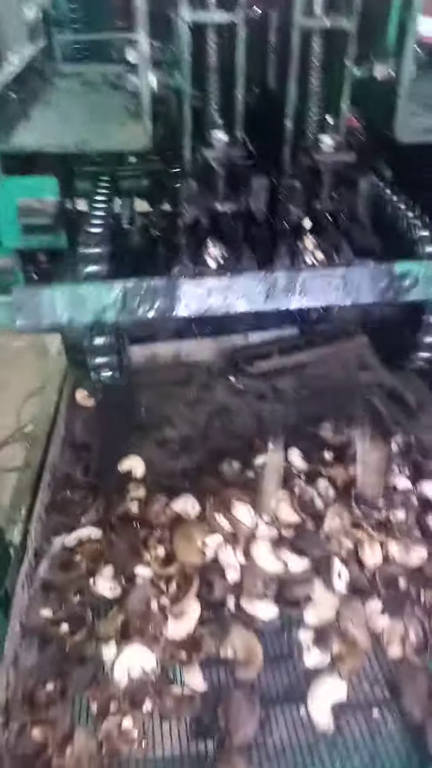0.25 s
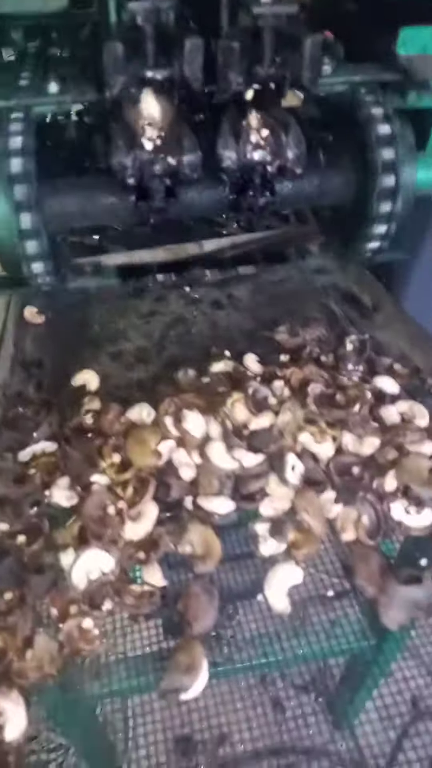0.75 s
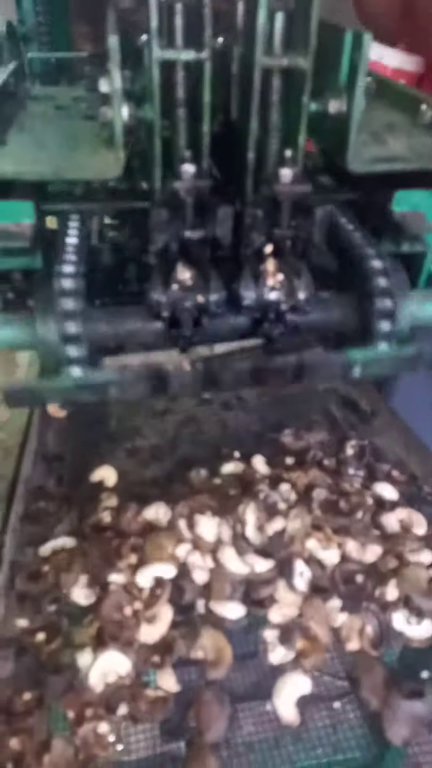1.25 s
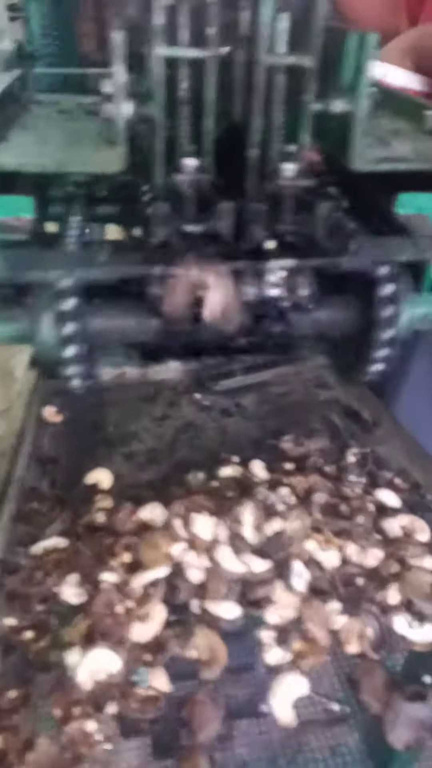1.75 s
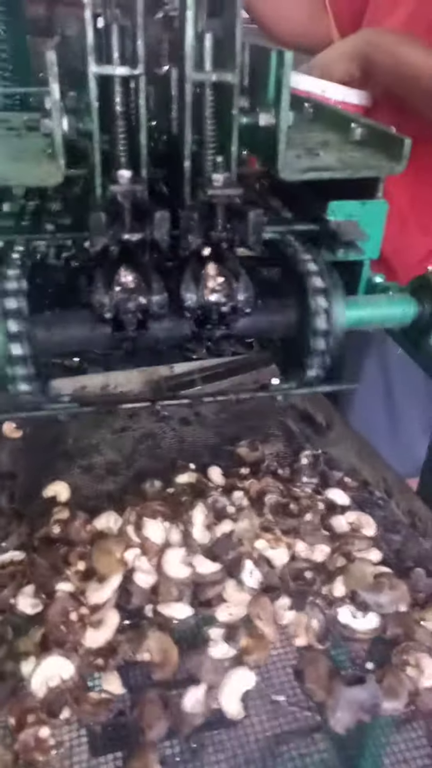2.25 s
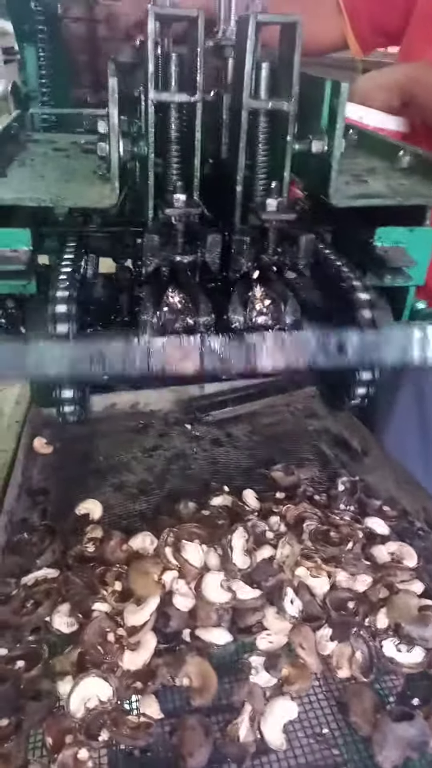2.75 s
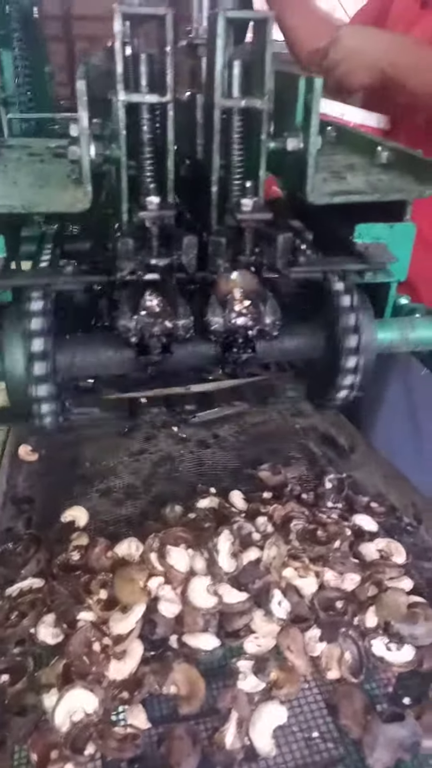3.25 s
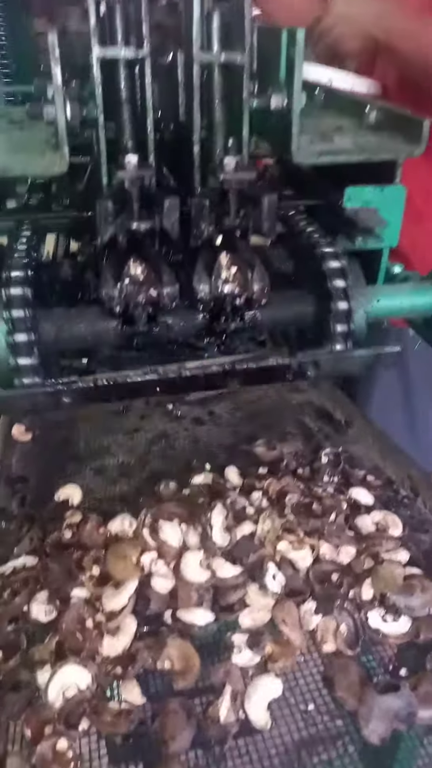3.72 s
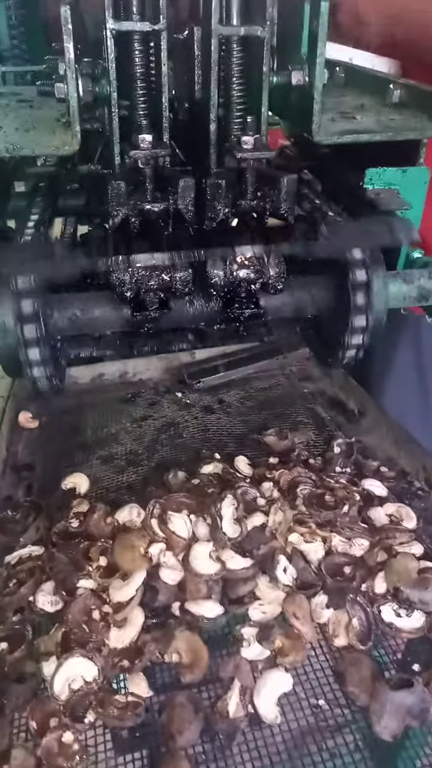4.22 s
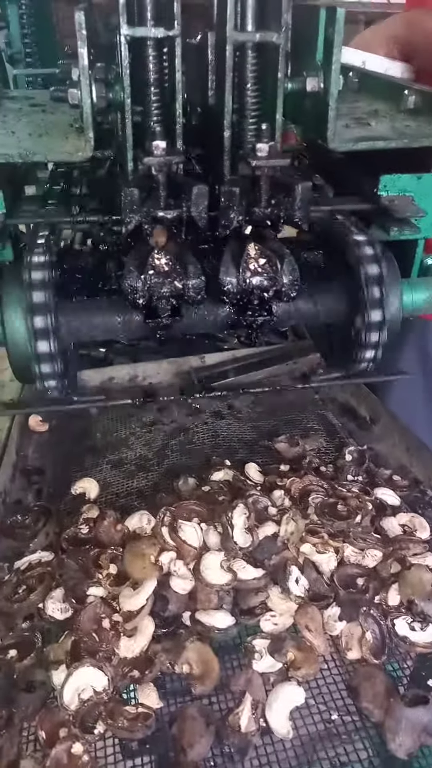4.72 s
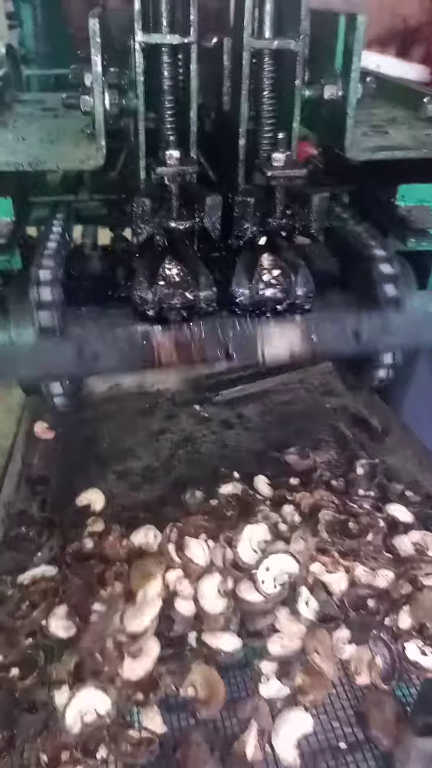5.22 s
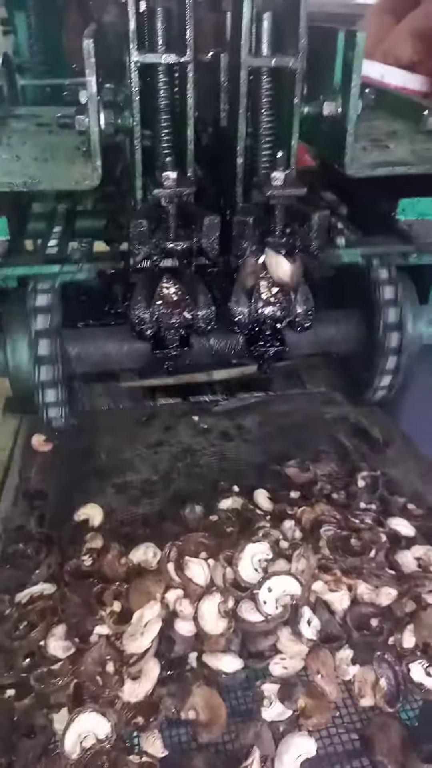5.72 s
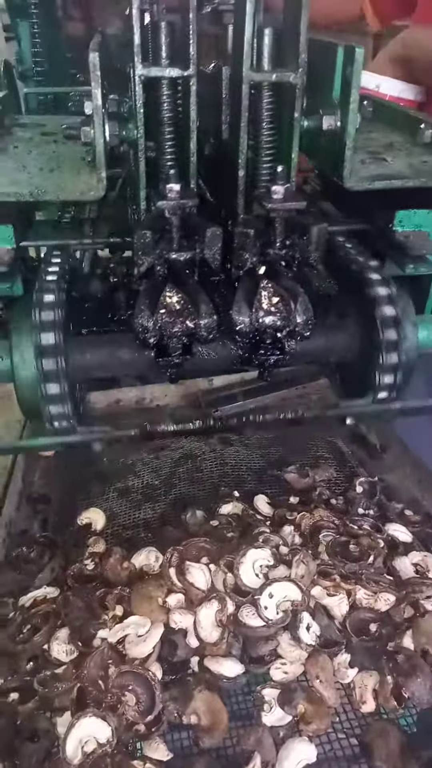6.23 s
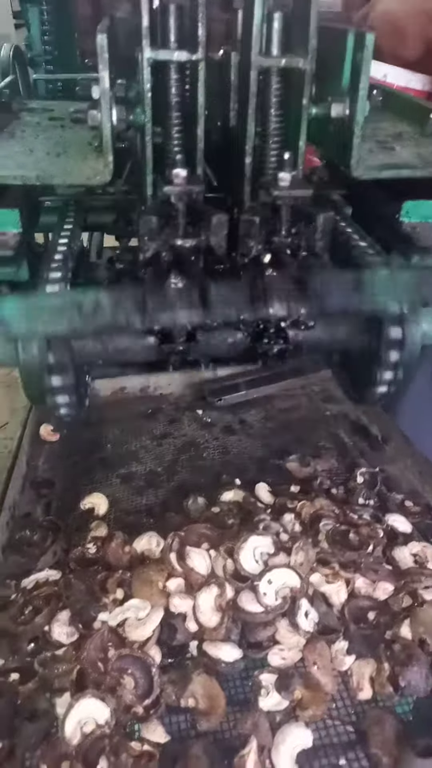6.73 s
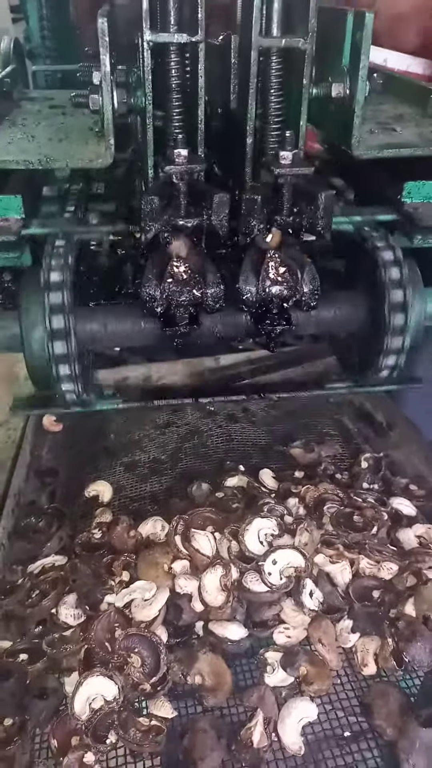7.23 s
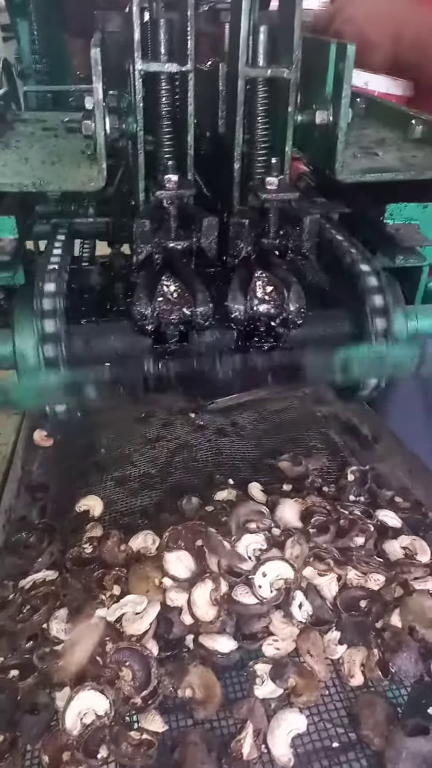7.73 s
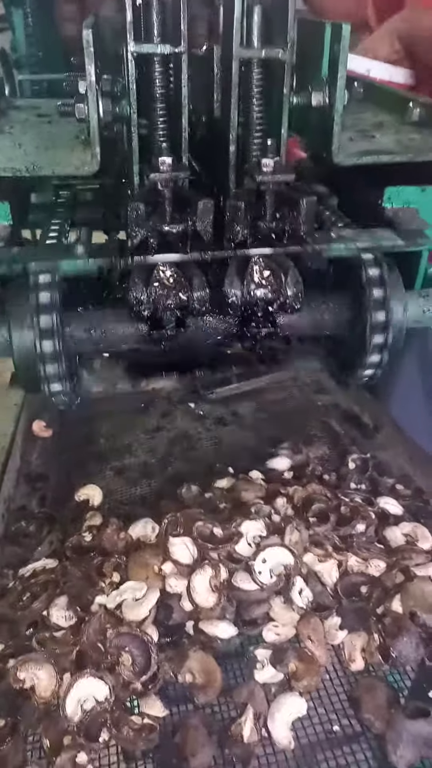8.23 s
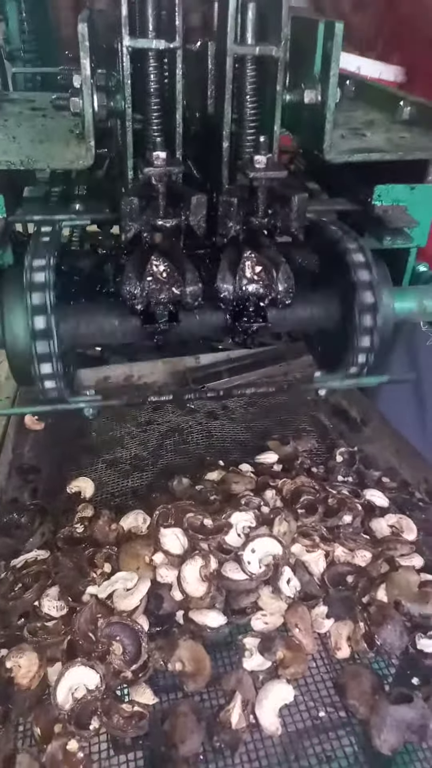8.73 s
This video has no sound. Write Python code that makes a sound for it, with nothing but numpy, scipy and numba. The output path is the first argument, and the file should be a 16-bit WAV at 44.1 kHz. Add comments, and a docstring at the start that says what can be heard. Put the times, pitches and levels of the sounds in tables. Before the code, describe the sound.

A cashew shelling machine clatters steadily up close, steel rattling and clanging over a motor hum, with shells snapping and pieces pattering on wire mesh.

```python
"""Cashew shelling machine in a workshop

A phone's microphone, close to the machine, hears steel clatter: blows ring clusters of modes, a lever
clangs, a scoop knocks, springs ping. Husks crunch at a steady cutting beat, shell snaps and other pitched
clicks break out, and pieces patter on a wire screen. Behind them chains rattle, the motor hums and its drive
shakes the frame. Plates and workshop add dense reflections; the phone's limiter ducks all at the loudest peaks.
"""
import sys
import numpy as np
from scipy import signal
from scipy.fft import rfft, irfft
from scipy.io import wavfile
from scipy.ndimage import uniform_filter1d, minimum_filter1d
from numba import njit

SR = 44100
rng = np.random.default_rng(int(sys.argv[2]) if len(sys.argv) > 2 else 0)


def unload_wav(signal):
    """Save mono or channel-first audio to the path in sys.argv[1] as 16-bit WAV at rate SR, clipped to [-1, 1]."""
    wavfile.write(
        sys.argv[1],
        SR,
        np.round(np.clip(np.atleast_2d(signal).T, -1, 1) * 32767).astype(np.int16),
    )


N = 395577
T = np.arange(N) / SR  # time of every sample [s]

# Blows of chains, blades and loose parts:
# (time [s], body level [dB], middle band re body [dB], treble re body [dB])
BLOWS = [(0.02, -29, 3, -12), (0.175, -25, -3.5, -18), (0.214, -34, 4.5, -25), (0.293, -32.5, 8, -5),
         (0.352, -25, -5, -17), (0.429, -26, 6, -9), (0.479, -21.5, 6, -7), (0.571, -29, 4.5, -6),
         (0.713, -27.5, 2, -6), (0.858, -25.5, 0.5, -10), (0.978, -24, 2, -7.5), (1.039, -26.5, 1, -15),
         (1.119, -17, -1, -10), (1.169, -26, 1, -4), (1.22, -28, 6, -4), (1.246, -21, 2, -8),
         (1.336, -28, -1, -19), (1.384, -27.5, 5, -10), (1.535, -25, 2.5, -7.5), (1.667, -30, 4.5, -3),
         (1.719, -24.5, 1, -13), (1.797, -27, 6, -0.5), (1.828, -25.5, -4, -4), (1.903, -24.5, -5.5, -32),
         (1.939, -28, 5, -11), (1.992, -27, -6.5, -20), (2.088, -29, 3, -7), (2.118, -24, -0.5, -24),
         (2.158, -24.5, -2, -23), (2.203, -31, 9.5, 3), (2.342, -23, 2.5, -7.5), (2.401, -29.5, 2, -4),
         (2.446, -19, -3.5, -13), (2.521, -32, -2, -25), (2.636, -17.5, 2.5, -6.5),
         (2.792, -24.5, -4.5, -26), (2.85, -25, 0, -16), (2.881, -21.5, -0.5, -15), (2.931, -22.5, -1, -17),
         (3.024, -37, 4, -14), (3.059, -25.5, 4.5, -12), (3.149, -25, -6.5, -18), (3.435, -24, 1, -11),
         (3.556, -24, -0.5, -4.5), (3.572, -23.5, 5, -12), (3.694, -26, 7, -0.5), (3.741, -15, -1.5, -10),
         (3.792, -37, 7, 1), (3.822, -29, 8.5, 2), (3.848, -34, 7, -15), (3.936, -37, 1, -2),
         (3.964, -23, 5.5, -4.5), (4.078, -35, 0, -4), (4.111, -36.5, 12.5, 3), (4.217, -26, 4, -7.5),
         (4.245, -35, 11, -14), (4.265, -25, -0.5, -10), (4.499, -23, -0.5, -8), (4.567, -21.5, 0.5, -16),
         (4.652, -40, 12.5, -13), (4.781, -26, 4.5, -7), (4.921, -24, 3, -14), (4.961, -34, 5, -10),
         (5.026, -19, -0.5, -13), (5.046, -33, 9.5, -2), (5.082, -29.5, 10, -3), (5.093, -29, -5, -21),
         (5.186, -28.5, 7.5, -4), (5.296, -28, -3, -17), (5.329, -26, 9, -0.5), (5.455, -23.5, -2, -12),
         (5.596, -29, 3.5, -4), (5.866, -27, 3, -4), (5.895, -21.5, 5.5, -4), (6.001, -27, 6, -11),
         (6.076, -24.5, -4, -23), (6.143, -33.5, 14, 1), (6.185, -25, 4, -12), (6.284, -23.5, 0.5, -5.5),
         (6.345, -38, 8, -6), (6.404, -21, -0.5, -13.5), (6.476, -32.0, -2, -18), (6.553, -21.5, 2.5, -8),
         (6.614, -16, -1, -6), (6.66, -33.5, 9, -9), (6.684, -20, 5.5, -5), (6.865, -31.5, -11, -30),
         (6.958, -32, -7, -20), (7.095, -24.5, 3, -10), (7.22, -30, -2, -27), (7.278, -30, 4, -16),
         (7.493, -27.5, 5, -7), (7.532, -25, 0, -12), (7.551, -33, -2, -18), (7.617, -33, 2.5, -3),
         (7.649, -17.5, 0.5, -12), (7.695, -29, 7.5, -15), (7.756, -21, -6, -22), (7.779, -29.5, 10.5, 0.5),
         (7.817, -31.5, 7, -14), (7.84, -24, 0, -16), (7.888, -36, 8, 4), (7.916, -27, 3, -1),
         (7.97, -25, 7.5, -2), (8.042, -23.5, 3.5, -6.5), (8.11, -28.5, 2.5, -13), (8.188, -30, 8.5, -2),
         (8.295, -39, 11, -13), (8.333, -26.5, 1.5, -10), (8.375, -26, -7, -22), (8.433, -26, -1, -12),
         (8.459, -24.5, 1, -16), (8.502, -25.5, 4.5, -13), (8.557, -30, 2, -22), (8.734, -24, -7, -14),
         (8.876, -34, 6.5, -11)]
# Clusters of close modes in chains, springs and blades: (centre [Hz], width [Hz], relative level [dB])
CLUSTERS = [(780,440,8),(1343,200,4),(1670,540,4.5),(2210,670,5),(2823,183,-2),(3190,510,-4),(3783,330,-1),(4500,550,0.5),(4815,370,0.5),(5590,210,-5),(5350,400,-10.5),(6550,1180,-4),(7820,330,-14),(10000,2400,-7),(11250,910,-8),(11020,1560,-7.5),(11900,340,-10),(14000,4500,-15),(14600,2100,-7)]
# A blow's level is its mean over this time [s]; body, middle band and treble meet at these pitches [Hz]
BLOW_S, BAND_EDGES_HZ = 0.025, (2500, 7500)

# Blows on the blade lever:
# (time [s], level [dB], centre of the excited modes [Hz], hold [s], share of the free ring time [0-1])
LEVER_BLOWS = [(1.589,-7.5,1620,.04,.85),(3.066,-25,2600,.002,.8),(3.79,-21.5,800,.05,1),(5.027,-19.5,2600,.004,1),(6.693,-3.5,1700,.006,.07),(7.657,-23,780,.05,1),(8.643,-14,1450,.007,.1)]
# Modes of the lever: (pitch [Hz], relative level [dB], free t60 [s])
LEVER_MODES = [(868,5.5,.8),(1228,-4,.15),(1410,-9,.2),(1603,3,.28),(1675,2.5,.33),(1745,-10,.12),(2220,-7,.07),(2342,0,.16),(2411,0,.4),(3042,-1,.15)]

# Shell snaps and other short, pitched clicks: (time [s], level [dB], pitch [Hz])
SNAPS = [(.047,-10,4490),(.062,-21,3980),(0.0892,-9,3430),(.433,-7,2120),(0.7937,-15,5500),(0.815,-4.5,3600),(0.905,-10.5,3500),(1.686,-8,4680),(1.825,-12.5,4320),(2.641,-10,4850),(2.993,-26,5500),(3.3087,-3.5,3040),(3.3665,-6,3600),(3.656,-17.5,1340),(3.727,-14,3040),(4.61,-11.5,5200),(4.8885,-2.5,3900),(4.963,-10,2400),(4.988,-14,3880),(5.257,-9,4500),(5.329,-20.5,4400),(5.442,-11.5,4500),(5.697,-27,5700),(5.7484,-6.5,3560),(5.8163,-17,2900),(7.3343,-8,5000),(7.3732,-5,4940),(7.39,0,4400),(7.4218,-10,4400),(7.443,-16,4360),(7.465,-14.5,3730),(7.724,-10.5,4460),(8.558,-16,2250),(8.675,-24,2030),(8.69,-13,5600)]
# High-pitched snaps crack brighter than low ones
SNAP_TREBLE_DB, SNAP_REF_HZ, SNAP_TREBLE_DB_PER_OCTAVE = -4.5, 5060, 55
SNAP_T60_S = 0.018  # the hollow ring lasts only an instant

# Husks crushed in each cut: (level as the blades bite [dB], level as they let go [dB])
CUTS = [(-44,-31),(-27.5,-48),(-36,-40),(-41,-40),(-44,-37),(-52,-36),(-49,-31),(-29.5,-40),(-35,-25.5),(-24.5,-44),(-47,-35)]
CUT_S = 0.8148  # steady beat of the blades
# Bite and release within a cut: start and length [s]
BITE_AT_S, BITE_S, RELEASE_AT_S, RELEASE_S = -0.009, 0.047, 0.469, 0.135
# Spectrum of crushed shell: (frequency [Hz], relative density [dB])
SHELL_SPECTRUM = [(1500,-18),(4000,-6),(6500,-1.5),(9000,-10),(12000,0),(16000,1)]
# Spectrum of light contacts on steel: (frequency [Hz], relative density [dB])
STEEL_SPECTRUM = [(300,-14),(700,1.5),(1100,-1),(1450,7),(2000,3),(2450,2),(2850,5),(3400,5.5),(4800,5),(5300,0),(6800,-3),(8500,-11.5),(11000,-9),(15500,-9.5)]

# Blows on the feed scoop, and renewed swells of its ringing:
# (time [s], clank level [dB], ring pitch [Hz], ring level [dB], overtone level [dB], ring and overtone t60 [s])
SCOOP_RINGS = [(.213,-24,1470,-25,-21,0.16),(1.066,-12,1407,-20,-20,0.49),(1.135,-32,1386,-21,-20,.6),(2.953,-16.5,1353,-23.5,-30,0.71),(4.265,-27,1448,-18,-29,0.2),(4.862,-15.5,1347,-17,-26,.25),(4.931,-23,1396,-19,-23,0.31),(6.432,-11,1359,-17,-30.5,.62),(8.5,-20,1430,-34,-28,.3)]
# Short-lived modes of the scoop's clank: (pitch [Hz], relative level [dB], t60 [s])
CLANK_MODES = [(1297,-2,0.07),(1380,6.5,0.054),(1507,3,0.066),(1575,3,0.038)]
SCOOP_OVERTONE_HZ = 2037  # the long-ringing upper tone

# Springs set ringing by a blow: (time [s], level [dB], pitch [Hz])
PINGS = [(0.439,-13.5,4630),(1.388,-20,4630),(1.846,-21,2590),(6.152,-22,4570),(8.461,-24,2800)]
PING_T60_S = 0.14
# Steel dragging over steel: (time [s], length [s], level [dB], pitch [Hz])
SCRAPES = [(3.716,0.15,-26.5,1700),(5.02,0.23,-31,1750),(6.676,0.18,-25.5,1640)]
# Light ticks between the blows
TICKS_PER_S, TICK_DB, TICK_SPREAD_DB, TICK_T60_S = 38, -42.5, 10, 0.019
# Running chains: (time [s], dull rattle level [dB], bright rattle setting [dB])
CHAINS = [(0.0, -33, -28), (1.72, -29.5, -48), (3.45, -30.5, -26), (3.67, -28.5, -22.5), (4.57, -32.5, -33),
          (5.15, -28.5, -42), (5.64, -35.5, -55), (6.54, -31.5, -22.5), (7.09, -35, -32),
          (7.82, -25.5, -25), (8.97, -37, -42)]
# Dull thuds in the frame: (time [s], level before the swell [dB], pitch [Hz])
THUDS = [(0.529,-28.5,215.6),(1.44,-20,450),(1.445,-43,106),(1.868,-33,231),(2.681,-30,236),(5.081,-33,235.3),(5.929,-33,230),(6.801,-33,219),(7.477,-29,229.5),(8.048,-34,240)]

# Load on the drive: (time [s], drive vibration setting [dB])
LOAD = [(0,-35.5),(.3,-32),(.9,-30.5),(1.45,-31),(1.9,-33),(2.5,-31.5),(3.3,-32.5),(3.9,-32),(4.4,-31),(5.15,-30),(5.7,-31),(6.3,-32.5),(6.9,-32),(7.35,-34),(7.8,-32),(8.2,-29.5),(8.6,-32.5),(8.97,-32)]
# Motor hum, on multiples of the mains frequency: (frequency [Hz], level about which it wavers [dB rms])
HUM = [(120,-61),(480,-37),(600,-34.5),(660,-46.5)]
# Noisy tones of the drive, some at harmonics of the motor, and frame resonances:
# (frequency [Hz], width [Hz], relative level [dB])
DRIVE_TONES = [(232.2,4.4,-1),(387.2,5.6,3.5),(494,8.4,8.5),(543,23,16),(775,8.4,5.5),(874,13,-31)]
# Spectrum of the drive's rumble: (frequency [Hz], relative density [dB])
RUMBLE_SPECTRUM = [(30,-72),(65,-30),(95,-25.5),(160,-14.5),(200,-5),(270,1.5),(350,1.5),(450,3.5),(650,2.5),(900,-3),(1150,-10.5),(2500,-29.5)]

TOP_HZ = 15850  # upper limit of the phone's sound


def undb(db):
    """Decibels to gain."""
    return 10 ** (np.asarray(db) / 20)


def unit(x):
    """Scale to rms 1."""
    return x / np.sqrt(np.mean(x ** 2) + 1e-18)


def add(track, s, x):
    """Mix a short sound in at time s, held within the track."""
    i = int(np.clip(s * SR, 0, N - 1))
    track[i:i + len(x)] += x[:N - i]


def through(x, response):
    """Pass a sound through an impulse response."""
    return signal.oaconvolve(x, response)[:len(x)]


def colour(points, size=4096):
    """Causal (minimum-phase) response of unit energy with the given spectrum."""
    hz, db = np.transpose(points)
    bins_hz = np.arange(size // 2 + 1) * SR / size
    log_gain = np.log(undb(np.interp(np.log(bins_hz + 1), np.log(hz), db)))
    # Folding the cepstrum onto positive times makes the response causal
    cepstrum = irfft(log_gain)
    cepstrum[1:size // 2] *= 2
    cepstrum[size // 2 + 1:] = 0
    response = irfft(np.exp(rfft(cepstrum)))
    return response / np.linalg.norm(response)


def band(x, hz, kind, order=2):
    """Butterworth filter."""
    return signal.sosfilt(signal.butter(order, hz, kind, fs=SR, output="sos"), x)


def decay_60(t, t60):
    """Exponential decay that falls 60 dB in t60 seconds."""
    return np.exp(-np.log(1000) * t / t60)


def fade(t60):
    """Exponential decay cut off at -60 dB."""
    return decay_60(T[:int(t60 * SR) + 2], t60)


def ring(modes, size=32768):
    """Impulse response of (Hz, dB, t60) modes with random phases, unit energy."""
    t = T[:size]
    response = np.zeros(size)
    for hz, db, t60 in modes:
        response += undb(db) * np.sin(2 * np.pi * (hz * t + rng.random())) * decay_60(t, t60)
    return response / np.linalg.norm(response)


def walk(rate):
    """Smooth random drift with a spread near 1."""
    k = int(SR / rate)
    steps = np.repeat(rng.standard_normal(N // k + 1), k)
    return unit(uniform_filter1d(uniform_filter1d(steps, k), k)[:N])


def impacts(rate, spread_db):
    """A random stream of tiny impacts of uneven size, rms 1."""
    hits = rng.random(N) < rate / SR
    sizes = undb(spread_db * np.clip(rng.standard_normal(N), -2, 2))
    return unit(hits * rng.choice([-1, 1], N) * sizes)


def rattle(n, depth=0.41, rate_hz=45):
    """Uneven contact makes a ringing mode flutter: phase offsets in radians."""
    return depth * unit(band(rng.standard_normal(n), rate_hz, "low"))


def room(x, t60, wet_db, damp_hz):
    """Dense reflections from the machine's plates and the workshop, duller than the direct sound."""
    decay = fade(t60)
    tail = band(rng.standard_normal(len(decay)) * decay, damp_hz, "low", order=1)
    tail[:SR // 250] = 0  # nothing returns in the first 4 ms
    return x + undb(wet_db) * through(x, tail / np.linalg.norm(tail))


def cluster_ring(hz, width, strike_s=0.0032, linger=0.27, linger_s=0.059):
    """One cluster of close modes: a quick burst, then a weaker remainder that lasts longer in low modes."""
    t = T[:SR // 5]
    decay = np.exp(-t / strike_s) + linger * np.exp(-t / (linger_s * (4000 / hz) ** 0.5))
    noise = rng.choice([-1., 1.], len(t))
    response = band(noise * decay, [hz - width / 2, hz + width / 2], "band")
    return response / np.linalg.norm(response)


def clatter(blows, rebound_s=0.0075, rebound_fade_s=0.0087, graze=0.47, count=5, spots=2):
    """Each blow grazes, lands and rebounds; every contact rings the steel's clusters in a new mix."""
    hz, _, cluster_db = np.transpose(CLUSTERS)
    rings = np.array([[cluster_ring(f, width) for f, width, _ in CLUSTERS] for _ in range(spots)])
    part = np.digitize(hz, BAND_EDGES_HZ)  # 0 body, 1 middle band, 2 treble
    out = np.zeros(N)
    for s, db, middle_db, treble_db in blows:
        gaps = rebound_s * rng.uniform(0.2, 1, count)
        lags = np.cumsum(gaps) - gaps[0]
        force = np.where(lags > 0, np.exp(-lags / rebound_fade_s), graze)
        # One mix for the blow, varied again at each contact
        mix_db = 2.5 * rng.standard_normal(len(hz)) + 4.5 * rng.standard_normal((count, len(hz)))
        shares = undb(cluster_db + mix_db) * force[:, None]
        # Bring each of the three bands to its level
        energy = np.bincount(part, np.sum(shares ** 2, axis=0))
        band_gain = undb(db + np.array([0, middle_db, treble_db])) * np.sqrt(BLOW_S * SR / energy)
        shares = shares * band_gain[part]
        for lag, share in zip(lags, shares):
            signs = rng.choice([-1, 1], len(hz))
            add(out, s + lag, (share * signs) @ rings[rng.integers(spots)])
    return room(undb(-0.66) * band(out, 570, "high"), t60=1.0, wet_db=-25.0, damp_hz=6000)


def clangs():
    """The struck lever holds its ring for a moment, then dies away; modes near the blow's centre ring most."""
    out = np.zeros(N)
    t = T[:SR // 2]
    for s, db, centre_hz, hold, free in LEVER_BLOWS:
        clang = np.zeros(len(t))
        for hz, mode_db, t60 in LEVER_MODES:
            decay = decay_60(np.maximum(t - hold, 0), t60 * free)
            gain = undb(mode_db - 15.0 * abs(np.log2(hz / centre_hz)))
            clang += gain * decay * np.sin(2 * np.pi * hz * t + rattle(len(t)))
        clang *= 1 - np.exp(-t / 0.0008)  # soft onset
        add(out, s, undb(db) * clang / np.abs(clang).max())
    return room(out, t60=1.0, wet_db=-20, damp_hz=6000)


def snaps(tear_s=0.00088, crack_db=6, nut_db=0):
    """Shell snaps and other pitched clicks: a tearing crack, slower at low pitch, and a brief hollow ring."""
    cracks, nuts = np.zeros((2, N))
    t = T[:SR // 20]
    for s, db, hz in SNAPS:
        treble_db = SNAP_TREBLE_DB + SNAP_TREBLE_DB_PER_OCTAVE * np.log2(hz / SNAP_REF_HZ)
        torn = t / (tear_s * SNAP_REF_HZ / hz)  # time in units of the tearing time
        ratios = np.array([0.84, 0.94, 1.03, 1.15]) * rng.uniform(0.96, 1.04, 4)
        nut = ring([(hz * ratio, 0, SNAP_T60_S) for ratio in ratios], size=len(t))
        nut *= 1 - np.exp(-torn)
        splinter = rng.standard_normal(len(t)) * torn * np.exp(1 - torn)
        crack = band(splinter, [0.69 * hz, 1.39 * hz], "band", order=1)
        crack += (undb(treble_db) + 0.16) * band(splinter, 7200, "high")
        add(cracks, s, undb(db + crack_db) * crack)
        add(nuts, s, undb(db + nut_db) * nut / np.abs(nut).max())
    return band(room(cracks, t60=0.32, wet_db=-9.5, damp_hz=3900) + nuts, 1040, "high")


def husk_crunch():
    """Husks crackle as the blades bite and let go: noise in dense splinter grains, shaped by pressure."""
    pressure = np.zeros(N)
    for cut, (bite_db, release_db) in enumerate(CUTS):
        start = cut * CUT_S
        for delay, length, db in (BITE_AT_S, BITE_S, bite_db), (RELEASE_AT_S, RELEASE_S, release_db):
            add(pressure, start + delay, undb(db) * signal.windows.tukey(int(length * SR), 0.4))
    grain = fade(0.008)
    # Grains add by energy
    splinters = np.sqrt(np.abs(through(impacts(rate=680, spread_db=9.5) ** 2, grain ** 2)))
    return through(pressure * unit(splinters) * rng.standard_normal(N), colour(SHELL_SPECTRUM))


def screen_patter():
    """Loose pieces fall at random on the wire screen, whose mesh answers each with a short noisy ring."""
    decay = fade(0.075)
    mesh = rng.standard_normal(len(decay)) * decay
    patter = through(impacts(rate=32, spread_db=2), mesh)
    return undb(-35.0) * unit(band(through(patter, colour(STEEL_SPECTRUM)), 470, "high"))


def shells():
    """Crushed husks and pattering pieces share short reflections from the nearby plates."""
    return room(husk_crunch() + screen_patter(), t60=0.1, wet_db=-7.0, damp_hz=6000)


def knocks(contact_s=0.0042):
    """The scoop clanks and rings in two tones, or its ringing swells anew; its seating sets the lower tone."""
    out = np.zeros(N)
    t = T[:SR]

    def mode(hz, db, t60):
        """One fluttering mode with a soft onset."""
        tone = np.sin(2 * np.pi * hz * t + rattle(len(t)))
        return undb(db) * tone * decay_60(t, t60) * (1 - np.exp(-t / contact_s))

    for s, db, ring_hz, ring_db, overtone_db, t60 in SCOOP_RINGS:
        clank = sum(mode(*row) for row in CLANK_MODES)
        tones = mode(ring_hz, ring_db, t60) + mode(SCOOP_OVERTONE_HZ, overtone_db, t60)
        add(out, s, undb(db) * clank / np.abs(clank).max() + tones)
    return room(out, t60=0.77, wet_db=-17.5, damp_hz=6000)


def pings():
    """A spring rings briefly on a close, beating pair of modes."""
    out = np.zeros(N)
    for s, db, hz in PINGS:
        ping = ring([(hz, 0, PING_T60_S), (hz * 1.013, -5, PING_T60_S)])
        add(out, s, undb(db) * ping / np.abs(ping).max())
    return out


def scrapes(width_hz=850):
    """Steel sticks and slips in dense, uneven jerks, heard in a band around each scrape's pitch."""
    out = np.zeros(N)
    jerks = through(impacts(rate=620, spread_db=6), colour(STEEL_SPECTRUM))
    for s, length, db, hz in SCRAPES:
        swell = signal.windows.tukey(int(length * SR), 0.7)
        rub = unit(band(jerks, [hz - width_hz / 2, hz + width_hz / 2], "band"))
        add(out, s, undb(db) * swell * rub[int(s * SR):][:len(swell)])
    return room(out, t60=0.75, wet_db=-10.0, damp_hz=5000)


def ticks():
    """Single links and crumbs of shell tick at random moments, each a short burst of bright noise."""
    decay = fade(TICK_T60_S)
    burst = rng.standard_normal(len(decay)) * decay
    clicks = through(impacts(rate=TICKS_PER_S, spread_db=TICK_SPREAD_DB), burst)
    return undb(TICK_DB) * unit(band(through(clicks, colour(STEEL_SPECTRUM)), 1300, "high"))


def chains():
    """Countless small link contacts rattle on between the blows, in a dull and a bright band."""
    s, *columns = np.transpose(CHAINS)
    dull_db, bright_db = (np.interp(T, s, column) for column in columns)
    links = through(impacts(rate=6000, spread_db=4.0), colour(STEEL_SPECTRUM))
    dull = undb(dull_db + 3 * walk(25)) * band(links, [300, 2400], "band", order=3)
    bright = undb(bright_db - 12.0 + 0.4 * walk(31)) * band(links, 2300, "high", order=3)
    return room(dull + bright, t60=0.046, wet_db=-9.0, damp_hz=8850)


def thuds():
    """A slow push on the frame swells one of its low modes, which booms on briefly."""
    out = np.zeros(N)
    t = T[:SR // 2]
    swell = (1 - np.exp(-t / 0.02)) * np.exp(-t / 0.085)
    for s, db, hz in THUDS:
        add(out, s, undb(db) * np.sin(2 * np.pi * hz * t) * swell)
    return out


def motor_hum():
    """Magnetic hum on mains multiples, wavering in pitch and level."""
    turns = T + 0.00019 * walk(5.5)  # running time with a slight wobble
    hum = np.zeros(N)
    for hz, db in HUM:
        tone = np.sqrt(2) * np.sin(2 * np.pi * (hz * turns + rng.random()))
        hum += undb(db + 2.1 * walk(11)) * tone
    return hum


def drive_vibration(load_db):
    """The drive rumbles and booms in noisy tones, motor harmonics and frame resonances, with the load."""
    tones = ring([(hz, db, np.log(1000) / (np.pi * width)) for hz, width, db in DRIVE_TONES])
    boom = band(through(rng.standard_normal(N), tones), 180, "high", order=3)
    rumble = through(rng.standard_normal(N), colour(RUMBLE_SPECTRUM))
    return (undb(-2.0) * rumble + undb(-4.5) * boom) * undb(load_db + 2.2 * walk(18))


def scene():
    """All parts of the machine at the one microphone."""
    load_db = np.interp(T, *np.transpose(LOAD))
    steel = clatter(BLOWS) + clangs() + knocks() + pings() + scrapes() + ticks() + chains()
    drive = motor_hum() + drive_vibration(load_db)
    return (steel + snaps() + shells() + thuds() + drive)[None]


@njit
def hold_peaks(x, release):
    """Peak follower: instant rise, slow fall."""
    out, e = np.empty(len(x)), 0.
    for i in range(len(x)):
        e = max(x[i], e * release)
        out[i] = e
    return out


def record(dry, ceiling_db=-6.0, release_s=0.061):
    """The phone's limiter looks a little ahead and recovers slowly; deep bass and the top are cut."""
    peaks = hold_peaks(np.abs(dry[0]), np.exp(-1 / (release_s * SR)))
    gain = 1 / np.maximum(peaks / undb(ceiling_db), 1)
    # Centred windows [samples] bring the gain down smoothly before a peak
    gain = uniform_filter1d(minimum_filter1d(gain, size=385), size=385)
    limited = band(dry[0] * gain, 37, "high")
    top_cut = signal.ellip(10, 0.2, 80, TOP_HZ, fs=SR, output="sos")
    return signal.sosfilt(top_cut, limited)[None]


dry = scene()
out = record(dry)
unload_wav(out)
```